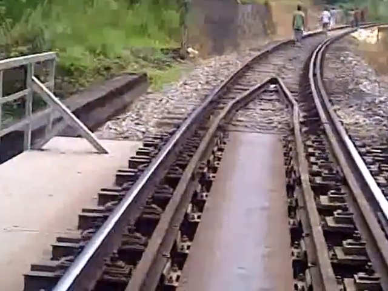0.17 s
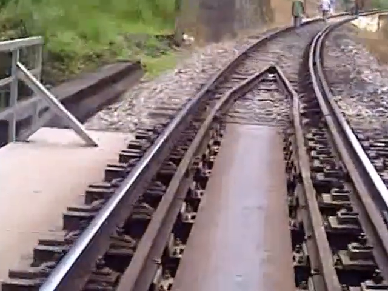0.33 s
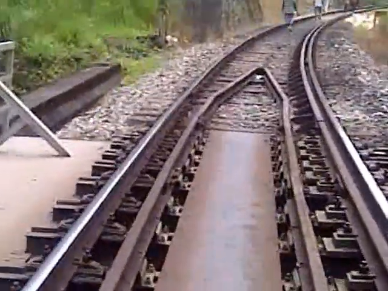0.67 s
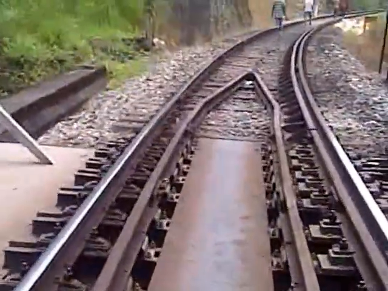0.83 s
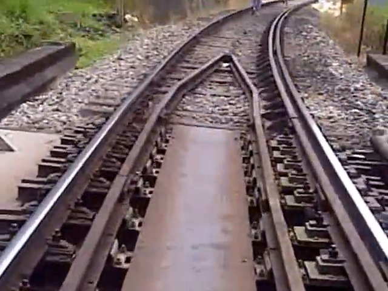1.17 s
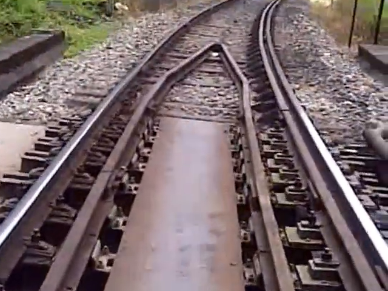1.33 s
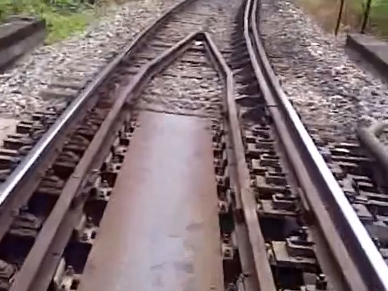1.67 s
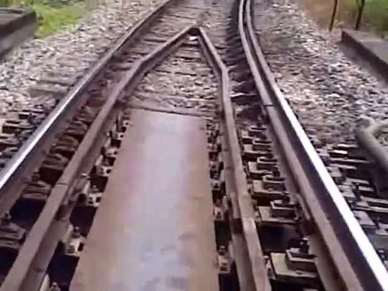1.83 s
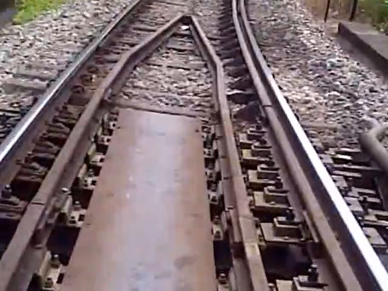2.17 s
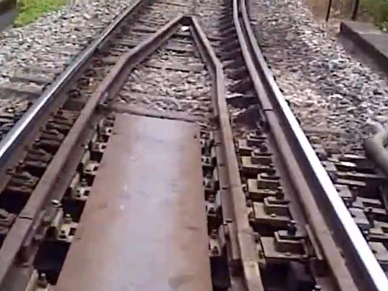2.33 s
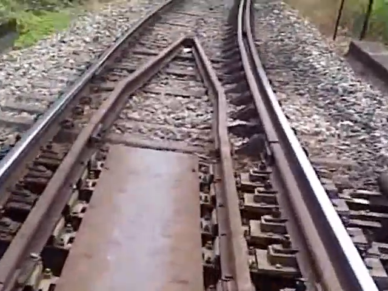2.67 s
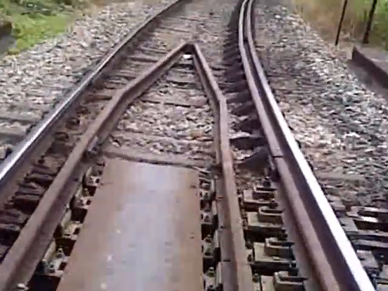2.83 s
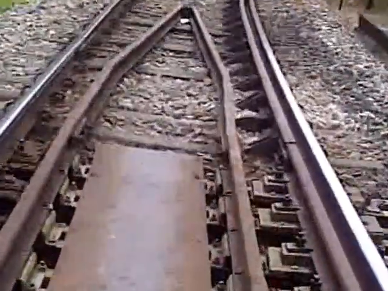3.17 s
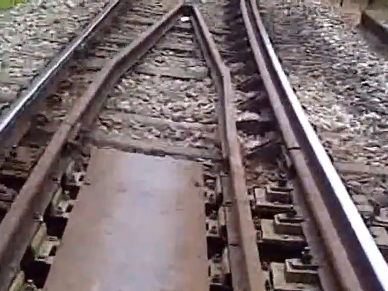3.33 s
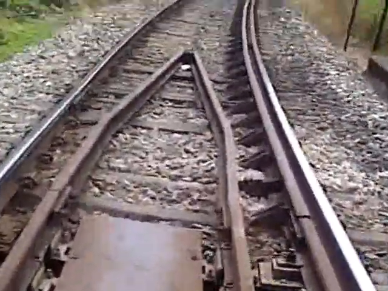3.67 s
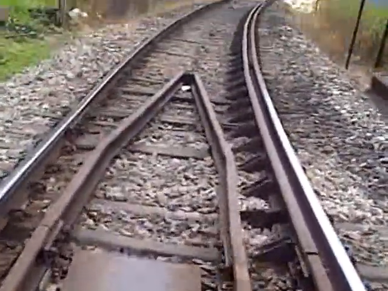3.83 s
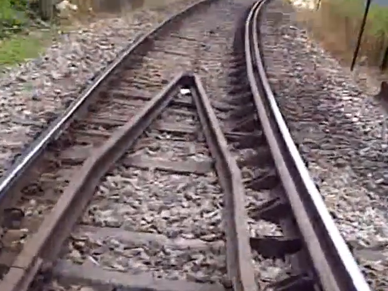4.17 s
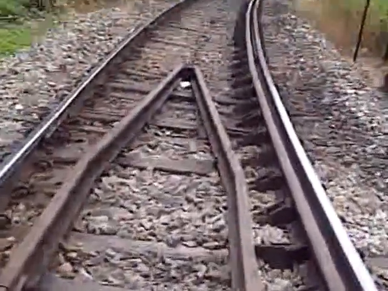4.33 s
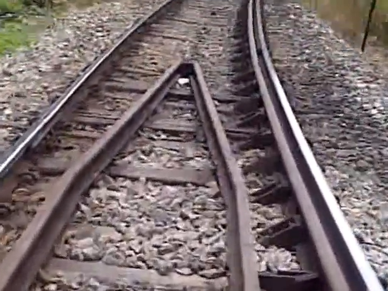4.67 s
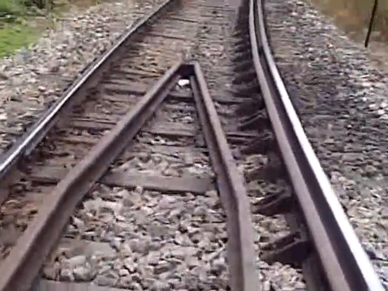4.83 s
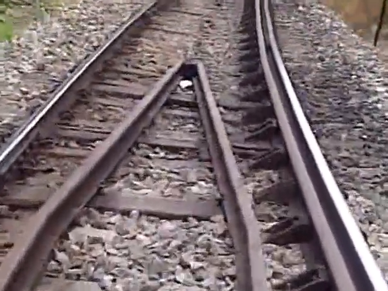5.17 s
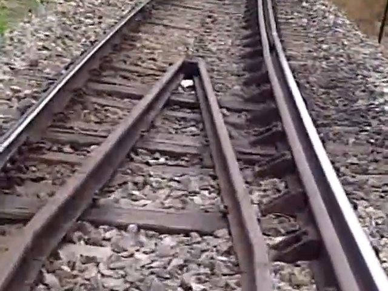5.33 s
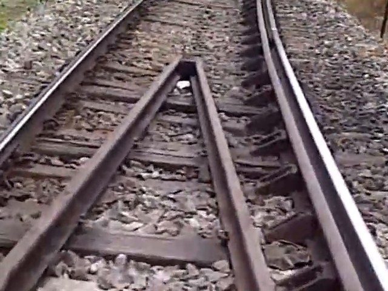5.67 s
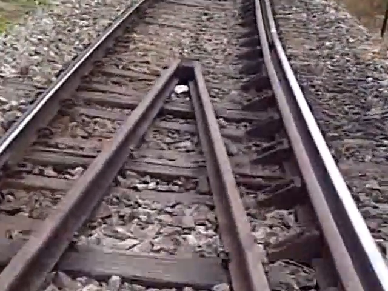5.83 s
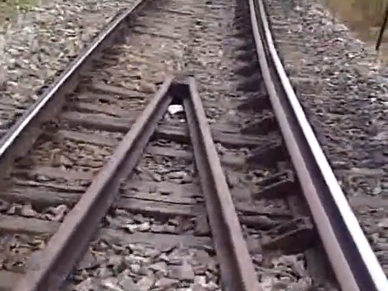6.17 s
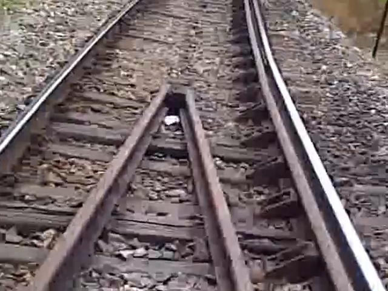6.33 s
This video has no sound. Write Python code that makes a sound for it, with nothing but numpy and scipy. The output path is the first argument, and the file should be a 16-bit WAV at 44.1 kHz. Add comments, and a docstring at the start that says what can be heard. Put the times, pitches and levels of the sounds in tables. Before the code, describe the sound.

Outdoors on a railway track, close dry knocks come first, then uneven footfalls boom on a loose steel plate. The plate slaps its supports after some steps in a dying rattle. A much louder, clanging step with a burst of clatter comes after four seconds, then near quiet with small stone ticks and a last short clack. Faint birds chirp in echoing trees over soft air; the microphone is carried by the walker.

```python
"""Footfalls boom in a loose steel plate as someone walks along a railway track towards the ballast.
The plate is a sum of decaying modes over a noise wash, and it slaps its supports as the weight shifts.
Filtered random impulses make crunching grit, resonant bursts loose stones, damped tones the rocking sleepers.
A few dry knocks and rubs sound close by; gliding tones with diffuse echoes are birds in the trees,
and coloured noise with slow and fast fluctuations is a faint outdoor rush."""
import sys
import numpy as np
from scipy import signal
from scipy.fft import rfft, irfft, next_fast_len
from scipy.io import wavfile
from scipy.ndimage import map_coordinates

SR = 44100
rng = np.random.default_rng(int(sys.argv[2]) if len(sys.argv) > 2 else 0)


def waveform_to_disk(signal):
    """Save audio, clipped to [-1, 1], as 16-bit WAV at the path in sys.argv[1]."""
    frames = np.transpose(np.atleast_2d(signal))
    scaled = np.clip(frames, -1, 1) * 32767
    samples = np.round(scaled).astype(np.int16)
    wavfile.write(sys.argv[1], SR, samples)


N = 286517  # length [samples]

# footfalls: (time [s], relative level [dB], hollow gain at 750 Hz [dB], edge gain from 4.2 kHz up [dB],
# note of the spot struck [Hz], decay-time factor [1], time constant of loading the plate [s])
FOOTFALLS = [(0.9734, -24, 0.5, -6, 293, 0.93, 0.00093), (1.507, -33, 3.5, 3, 192, 1.45, 0.0013),
             (2.577, -23.5, 1.5, -3.5, 275, 0.92, 0.0043), (3.048, -19, 1, 4.5, 380, 0.68, 0.0056),
             (4.103, -21, -0.5, 5.5, 322, 1.52, 0.0021), (4.121, -11.5, -0.5, -5.5, 472, 0.74, 0.00177),
             (4.606, -22.5, 4, 1, 413, 0.66, 0.0029), (6.143, -16.5, -16, 4, 340, 0.4, .0006)]
# spectrum of the plate's many weak modes, also used for broadband contact noise:
# (frequency [Hz], relative level per Hz [dB])
WEAK_MODES = [(25, -43), (60, -9), (130, -1.5), (300, 5.5), (500, 2), (750, -3.5), (1200, -3.5),
              (1650, -11.5), (2500, -8), (3230, -16.5), (3600, -20), (4900, -16.5), (6000, -30),
              (7500, -46)]


def amp(db):
    """Level to amplitude: 20 dB is a factor of ten."""
    return 10 ** (np.asarray(db) / 20)


def unit(x):
    """Normalisation: the signal scaled to an rms of 1."""
    return x / np.sqrt(np.mean(x ** 2) + 1e-20)


def along(points, hz):
    """Interpolation of (frequency [Hz], value) points on a logarithmic frequency axis."""
    f, value = np.transpose(points)
    return np.interp(np.log(hz + 1), np.log(f), value)


def seconds(length):
    """Sampling: a time axis [s] of the given length [s]."""
    return np.arange(int(length * SR)) / SR


def add(track, s, sound):
    """Superposition: sound pressures add, here from time s [s] onwards."""
    part = track[max(round(s * SR), 0):][:len(sound)]
    part += sound[:len(part)]


def filtered(x, response):
    """Linear filtering: the spectrum is multiplied by a response of frequency [Hz]."""
    m = next_fast_len(len(x) + 8192)
    return irfft(rfft(x, m) * response(np.fft.rfftfreq(m, 1 / SR)), m)[:len(x)]


def noise(spectrum, size):
    """Coloured noise: white noise shaped by a spectrum, at an rms of 1."""
    return unit(filtered(rng.standard_normal(size), lambda hz: amp(along(spectrum, hz))))


def wobble(rate):
    """Random modulation: a smooth spline through Gaussian knots, rate knots a second."""
    knots = rng.standard_normal(int(N * rate / SR) + 4)
    return map_coordinates(knots, [np.arange(N) * rate / SR])


def random_times(per_s):
    """Jittered timing: one uniformly random instant [s] in each period of 1 / per_s."""
    count = int(per_s * N / SR)
    return (np.arange(count) + rng.random(count)) / per_s


def contact(hz, boom_db, edge_db, clang_db=0):
    """Contact spectrum: a heavy contact feeds the bass, a hard, brief one the treble."""
    return amp(along([(450, boom_db), (1100, 0.0033), (2600, clang_db), (4200, edge_db)], hz))


def air(level_db=-52.0, drift_db=1.0, flutter_db=2.5, hiss_flutter_db=0.94, split_hz=800):
    """Broadband rush of the open air: the low part fluctuates more in level than the hiss."""
    # spectrum: (frequency [Hz], relative level per Hz [dB])
    rush_spectrum = [(20, -19.5), (40, -17), (60, -4), (120, -0.5), (220, -3), (350, -4.5), (480, -4),
                     (700, -8.5), (1100, -10), (1750, -15.5), (2500, -17), (3100, -22.5), (5000, -27.5),
                     (6800, -37), (7500, -54.5)]
    rush = noise(rush_spectrum, N)
    low = filtered(rush, lambda hz: 1 / (1 + (hz / split_hz) ** 4))
    hiss = rush - low
    drift = amp(level_db + drift_db * wobble(rate=1.842))
    restless_low = low * amp(flutter_db * wobble(rate=22))
    return drift * (restless_low + hiss * amp(hiss_flutter_db * wobble(rate=23)))


def bumps(level_db=-3, rise=0.0016, overtone=1.62, overtone_db=-9):
    """Damped resonance: sleepers rocking in their bed give brief low notes with a weak overtone."""
    # distinct bumps: (time [s], relative level [dB], note [Hz], 60 dB decay time [s])
    distinct = [(0.007, -35, 201, .09), (0.389, -32.5, 206, 0.09), (0.470, -31.5, 202, 0.092),
                (0.976, -17, 273, .06), (1.464, -32, 450, 0.052), (1.51, -18, 149, .09),
                (1.593, -17, 406, 0.062), (1.665, -19, 402, 0.065), (2.505, -26.5, 180, 0.073),
                (2.684, -22, 284, 0.11), (3.075, -12, 385, 0.09), (3.1, -16, 199, 0.095),
                (3.424, -32.5, 213, 0.075), (3.555, -29, 191, .11), (4.12, -3.5, 453, 0.049),
                (4.148, -5.5, 465, .055), (4.171, -6.5, 513, 0.053), (4.32, -19.5, 249, 0.081),
                (4.814, -35, 253, 0.13), (5.088, -35, 401, 0.074), (5.607, -36, 368, 0.085),
                (6.11, -33, 282, .08), (6.143, -16.5, 418, 0.039), (6.169, -18, 147, 0.12),
                (6.357, -34.5, 402, 0.05)]
    # fainter bumps all along the walk: level and pitch scatter about a typical bump
    faint_db, spread_db = -46, 2.5
    typical_hz, spread_octaves, faint_t60 = 233, 0.55, 0.18
    out, t = np.zeros(N), seconds(0.25)
    faint = [(s, faint_db + spread_db * rng.standard_normal(),
              typical_hz * 2 ** (spread_octaves * rng.standard_normal()), faint_t60)
             for s in random_times(per_s=12)]
    for s, db, hz, t60 in list(distinct) + faint:
        fundamental = np.sin(2 * np.pi * hz * t)
        upper = amp(overtone_db) * np.sin(2 * np.pi * overtone * hz * t)
        envelope = amp(db + level_db - 60 * t / t60) * (1 - np.exp(-t / rise))
        add(out, s, envelope * (fundamental + upper))
    return out


def cracks(size, rate, edge_db, spread_db=3):
    """Shot noise: random impulses of uneven size, on average rate a second, filtered to an rms of 1."""
    # spectrum of grit: (frequency [Hz], relative level per Hz [dB])
    grit_spectrum = [(40, -12.5), (150, 7), (400, 1.5), (800, -9.5), (1300, -11.5), (2600, -17.5),
                     (3600, -21), (5200, -21.5), (7500, -43.5)]
    sizes = rng.standard_normal(size) * amp(spread_db * rng.standard_normal(size))
    hits = sizes * (rng.random(size) < rate / SR)
    return unit(filtered(hits, lambda hz: amp(along(grit_spectrum, hz)) * contact(hz, 0, edge_db)))


def scuffs(level_db=-8, grain_rate=1400, t60=0.21, rise=0.0024):
    """Granular fracture: grit crushed under a sole is a decaying spray of tiny cracks."""
    # soft treads and scrapes: (time [s], relative level [dB], edge gain from 4.2 kHz up [dB])
    treads = [(0.008, -32.5, -30), (1.358, -35.5, -1), (2.504, -33, -5), (3.47, -37, -17),
              (3.557, -32, -30), (3.626, -27.5, -10), (5.09, -31, -6), (5.186, -34.5, -12),
              (5.606, -36, -16), (5.837, -44, 11), (6.25, -27, 2.5)]
    out, t = np.zeros(N), seconds(0.25)
    # the sole brushes the ground 22 ms before each footfall
    brushes = [(s - 0.022, -33.5, -16.5) for s, *_ in FOOTFALLS]
    # stray grit shifts at random
    strays = [(s, -44.5, -0.5) for s in random_times(per_s=3.7)]
    for s, db, edge_db in list(treads) + brushes + strays:
        envelope = amp(db + level_db - 60 * t / t60) * (1 - np.exp(-t / rise))
        add(out, s, envelope * cracks(len(t), grain_rate, edge_db))
    return out


def note(length, start_hz, middle_hz, end_hz, buzz=0.018):
    """Frequency modulation: a tone glides through three pitches; a fast random waver makes it buzzy."""
    t = seconds(length)
    u = t / length
    pitch = np.polyval(np.polyfit([0, 0.5, 1], [start_hz, middle_hz, end_hz], 2), u)
    waver = map_coordinates(rng.standard_normal(size=400), [t * 800])
    phase = 2 * np.pi * np.cumsum(pitch * (1 + buzz * waver)) / SR
    return np.sqrt(2 * np.sin(np.pi * u)) * np.sin(phase)


def scatter(x, t60, rise):
    """Diffuse scattering: leaves and trunks act as a decaying noise impulse response of unit energy."""
    t = seconds(0.8)
    trees = rng.standard_normal(len(t)) * amp(-60 * t / t60) * (1 - np.exp(-t / rise))
    return signal.fftconvolve(x, trees / np.linalg.norm(trees))[:N]


def birds(direct_db=-1.0, blur_db=-10, echo_db=-3, whistle_echo_db=-9, echo_t60=0.56):
    """Direct and scattered sound: near foliage blurs all calls, a wooded slope echoes far ones most."""
    # one bird's whistled phrases: (time [s], relative level [dB])
    phrases = [(0.027, -53), (3.416, -55.5), (5.934, -53.5)]
    # the rising notes of a phrase: (delay [s], length [s], start [Hz], middle [Hz], end [Hz],
    # relative level [dB])
    phrase_notes = [(0, 0.06, 1560, 1930, 1930, -1.5), (.098, .112, 1470, 2200, 2440, 0),
                    (.19, .11, 2440, 2560, 2580, -7)]
    # falling chirps of other birds: (time [s], length [s], start [Hz], fall [share of pitch],
    # relative level [dB], waver [share of pitch])
    falling = [(2.132, 0.081, 3520, 0.14, -54, 0.0082), (2.499, 0.014, 5000, 0.15, -55, 0.049),
               (2.532, 0.053, 3360, 0.064, -55.5, 0.024), (2.712, 0.01, 4300, 0.025, -54, 0.041),
               (2.751, 0.034, 5750, 0.087, -61, 0.047), (2.775, .026, 4150, 0.18, -51.5, 0.037),
               (4.7, 0.04, 3370, 0.12, -51, .006), (5.015, 0.083, 4330, 0.17, -53, .014),
               (5.287, 0.049, 5950, 0.17, -63.5, 0.0776), (5.543, 0.026, 5200, 0.16, -63, 0.046),
               (5.581, 0.04, 3300, .04, -61, .04), (6.005, .045, 5950, .18, -71, 0.012)]
    # buzzy calls wavering fast about one pitch: (time [s], length [s], relative level [dB])
    buzzes = [(2.392, 0.096, -59), (3.464, .045, -69), (3.684, 0.068, -59.5), (5.79, 0.2, -64)]
    early_fall = 0.5  # share of a chirp's fall done by its middle
    buzz_hz, buzz_waver = 3340, 0.11  # waver as a share of pitch
    whistles, chirps = np.zeros(N), np.zeros(N)
    for s, db in phrases:
        for delay, *glide, note_db in phrase_notes:
            add(whistles, s + delay, amp(db + note_db) * note(*glide))
    for s, length, hz, fall, db, waver in falling:
        chirp = note(length, hz, hz * (1 - early_fall * fall), hz * (1 - fall), waver)
        add(chirps, s, amp(db) * chirp)
    for s, length, db in buzzes:
        add(chirps, s, amp(db) * note(length, buzz_hz, buzz_hz, buzz_hz, buzz_waver))
    calls = whistles + chirps
    slope = scatter(amp(whistle_echo_db) * whistles + amp(echo_db) * chirps, echo_t60, rise=0.013)
    blur = scatter(calls, t60=0.035, rise=0.001)
    return amp(direct_db) * calls + amp(blur_db) * blur + slope


def ticks(level_db=-7, sharpness=17.0, snap_db=-5.0, snap_t60=0.0038, snap_edge_db=14):
    """Impact and resonance: loose stones tip or crack with a sharp snap, then ring at their own note."""
    # distinct ticks: (time [s], relative level [dB], note [Hz])
    distinct = [(0.978, -18.5, 1090), (0.992, -21, 2540), (1.358, -38.5, 1510), (1.537, -19, 2360),
                (1.598, -23, 2300), (1.665, -27, 2400), (1.676, -28, 1150), (1.767, -31.5, 2480),
                (1.785, -39, 1200), (1.719, -27.5, 2350), (1.967, -36, 2520), (2.229, -32, 1150),
                (2.584, -19.5, 1220), (3.777, -38, 2300), (3.789, -35.5, 1160), (3.85, -44, 2260),
                (4.127, -16, 1090), (4.134, -11, 1890), (4.143, -13.5, 2930), (4.153, -14, 2500),
                (4.187, -29, 4800), (4.259, -36, 4900), (5.09, -42, 1300), (5.112, -39, 2120),
                (5.163, -37, 1350), (5.381, -37, 1150), (5.609, -42, 453), (5.752, -47, 1120),
                (5.837, -36, 2430), (5.857, -35, 1680), (6.1475, -15, 2370), (6.372, -35, 1200)]
    # fainter stones settling all along the walk: level and pitch scatter about a typical tick
    faint_db, spread_db = -50, 4
    typical_hz, spread_octaves = 1020, 0.59
    stone_t60 = 0.032  # s, of every stone
    out, t = np.zeros(N), seconds(0.06)
    faint = [(s, faint_db + spread_db * rng.standard_normal(),
              typical_hz * 2 ** (spread_octaves * rng.standard_normal()))
             for s in random_times(per_s=9.9)]

    for s, db, note_hz in list(distinct) + faint:
        def resonance(hz):
            return 1 / (1 + 1j * sharpness * (hz / note_hz - 1)) / (1 + (hz / 4500) ** 4)
        stone = unit(filtered(rng.standard_normal(len(t)), resonance))
        snap = unit(filtered(noise(WEAK_MODES, len(t)), lambda hz: contact(hz, -snap_edge_db, 0)))
        tick = amp(-60 * t / stone_t60) * stone + amp(snap_db - 60 * t / snap_t60) * snap
        add(out, s, amp(db + level_db) * tick)
    return out


def knocks(level_db=-6, after_db=-23, after_t60=0.12, after_boom_db=-6, thud_hz=230, thud_t60=0.029,
           even_db=-15.5, edge_per_db=0.46):
    """Modal impact: close dry knocks excite damped modes, brighter when harder, over a soft thud."""
    # knocks: (time [s], relative level [dB], thud level [dB])
    blows = [(0.503, -26, -31.5), (0.540, -24.5, -38), (0.562, -20, -47), (0.597, -23.5, -32),
             (0.6129, -5, -51), (0.694, -25, -27.5), (0.705, -25.5, -47)]
    # modes of the knocked body: (frequency [Hz], relative level [dB], 60 dB decay time [s])
    body_modes = [(490, 1.5, 0.027), (990, 6, 0.0043), (1280, -16, 0.054), (1770, -12.5, 0.008),
                  (3400, -14, 0.0072), (5370, -28.5, 0.005)]
    # faint rubs before the hardest knock: (time [s], length [s], level [dB])
    rubs = [(0.531, 0.054, -39.5), (0.582, 0.038, -42.5)]
    out, t = np.zeros(N), seconds(0.15)
    for s, db, thud_db in blows:
        edge_db = edge_per_db * (db - even_db)  # negative below even_db: softer is duller
        ring = np.zeros(len(t))
        for k, (hz, mode_db, t60) in enumerate(body_modes):
            gain = (-1) ** k * contact(hz, 0, edge_db, edge_db)
            ring += gain * amp(mode_db - 60 * t / t60) * np.sin(2 * np.pi * hz * t)
        thud = amp(thud_db - 60 * t / thud_t60) * np.sin(2 * np.pi * thud_hz * t)
        rustle = filtered(noise(WEAK_MODES, len(t)), lambda hz: contact(hz, after_boom_db, 0))
        rustle *= amp(after_db - 60 * t / after_t60)
        add(out, s, amp(db + level_db) * (ring + rustle) + thud)
    for s, length, db in rubs:
        swell = np.hanning(len(seconds(length)))
        grains = cracks(len(swell), rate=1900, edge_db=-1.5)
        rub = unit(filtered(grains, lambda hz: contact(hz, -9.5, 0)))
        add(out, s, amp(db) * swell * rub)
    return out


def plate(boom_db, hollow_db, clang_db, edge_db, spot_hz, ring, rise, modes_db=-14.5, spot_db=5,
          clang_peak_db=6, chatter_db=-4, chatter_t60=0.064):
    """Modal synthesis: a blow excites decaying plate modes, favouring a low note and a high clang."""
    # strong modes: (frequency [Hz], relative level [dB], 60 dB decay time at ring = 1 [s])
    strong_modes = [(99.7, -10, 3.8), (142, 2, 0.72), (165.3, -2.5, 1.42), (210, -3.5, 0.85),
                    (242, -4, 1.5), (272, 2.5, 0.61), (308.7, 0.5, 1.05), (379, -0.5, 0.91),
                    (449.5, 2.5, 0.94), (477, -1.5, 0.6), (533, -2, 0.87), (571, -4.5, 0.54),
                    (652, -6.5, 0.76), (699, -6.5, 0.84), (744, -5.5, 0.82), (898, -8.5, 0.29),
                    (934, -7, 0.65), (1037, -8, 0.45), (1130, -2.5, 0.5), (1248, -1, 0.38),
                    (1379, -7.5, 0.23), (1645, -3, 0.36), (1904, -2.5, 0.25), (1990, -4.5, .25),
                    (2345, -9, 0.2), (2475, -8, 0.2), (2610, -8, 0.2), (2855, -13, 0.23), (2980, -10, 0.16),
                    (3104, -6.5, 0.22)]
    # weak modes: (frequency [Hz], 60 dB decay time at ring = 1 [s])
    weak_t60 = [(60, 0.51), (200, 0.96), (450, 0.56), (1100, 0.51), (2700, 0.27), (6000, 0.22)]
    t = seconds(1)
    blow = [(450, boom_db), (750, hollow_db), (1150, 0.0078), (2600, clang_db), (4200, edge_db)]
    # a stiffer spot also clangs higher: 0.28 octaves per octave of its note
    clang_hz = 2566 * (spot_hz / 310) ** 0.28

    def colour(hz):
        spot_peak = spot_db / (1 + (7 * (hz / spot_hz - 1)) ** 2)
        clang_peak = clang_peak_db / (1 + (11 * (hz / clang_hz - 1)) ** 2)
        return amp(along(blow, hz) + spot_peak + clang_peak)

    # the weak modes merge into a wash that decays at its own pace in each band
    f, age, bands = signal.stft(filtered(noise(WEAK_MODES, len(t)), colour), SR, nperseg=256)
    decay = amp(-60 * age / (ring * along(weak_t60, f)[:, None]))
    wash = signal.istft(bands * decay, SR, nperseg=256)[1][:len(t)]
    # the strong modes wake in new strengths and polarities at every blow
    hz, db, t60 = np.transpose(strong_modes)
    size = amp(db + modes_db + rng.normal(0, 2.1, len(hz))) * colour(hz)
    size *= rng.choice([-1, 1], len(hz))
    mode_decay = np.exp(-np.log(1000) * t / (ring * t60[:, None]))
    modes = size @ (np.sin(2 * np.pi * hz[:, None] * t) * mode_decay)
    # steel chatters against its seat in the first moments
    chatter = amp(chatter_db - 60 * t / chatter_t60) * cracks(len(t), rate=760, edge_db=edge_db)
    return (wash + modes + chatter) * (1 - np.exp(-t / max(rise, 1e-4)))


def footfalls(girders_db=-15.0, girders_t60=1.84, shudder_db=4.0, even_db=-24, boom_loss=0.63,
              clang_share=0.74):
    """Structure-borne sound: each step strikes the plate and the structure beneath shudders after it."""
    # rumble of the structure: (frequency [Hz], relative level per Hz [dB])
    girder_spectrum = [(25, -32), (70, 2.5), (110, 0), (300, -4.5), (500, -5.5), (1000, -20.5),
                       (2500, -21.5), (5000, -51)]
    out, t = np.zeros(N), seconds(2.0)
    for s, db, hollow_db, edge_db, spot_hz, ring, rise in FOOTFALLS:
        boom_db = boom_loss * (even_db - db)  # a harder step has a smaller share of bass
        clang_db = clang_share * edge_db
        strike = plate(boom_db, hollow_db, clang_db, edge_db, spot_hz, ring, rise)
        add(out, s, amp(db) * strike)
        fade_db = shudder_db * wobble(rate=39)[:len(t)] - 60 * t / (ring * girders_t60)
        rumble = noise(girder_spectrum, len(t)) * amp(fade_db) * (1 - np.exp(-t / 0.033))
        add(out, s, amp(db + boom_db + girders_db) * rumble)
    return out


def rattles(level_db=-9.5, smack_db=-2, smack_t60=0.023):
    """Repeated impact: the loose plate slaps its supports with a short hard smack and a ring; the last row is
    the sharp smack of the footfall at 6.143 s itself."""
    # slaps, the last being the hard smack of the footfall at 6.143 s: (time [s], relative level [dB], # clang
    # gain at 2.6 kHz [dB], edge gain from 4.2 kHz up [dB], note of the spot struck [Hz])
    slaps = [(1.068, -32.5, 3.5, 2.5, 320), (1.5072, -28, -1, 13.5, 415), (1.5354, -20.5, 1.5, 0, 210),
             (1.5962, -22.5, 0.5, 2, 370), (1.664, -25, 1.5, 5.5, 252), (1.717, -25.5, -3, 2.5, 297),
             (1.765, -30, 1.5, 3, 230), (1.811, -39.5, 4.5, 6.5, 282), (1.914, -38, -0.5, -1, 286),
             (1.967, -31, -3.5, -1, 270), (2.017, -35, -2, -5, 293), (2.158, -31, -8, 1.5, 327),
             (2.229, -24, -7, -2, 282), (4.148, -17.5, 3, -10, 490), (4.1856, -13, 10.5, 5.5, 610),
             (4.228, -21, 1.5, 5, 553), (4.257, -21, 7, 5, 330), (4.281, -24.5, 7, 4, 540),
             (4.323, -27, 2.5, 3.5, 297), (4.441, -23.5, 3.5, -8, 480), (6.1427, -21.5, 12.5, 12.5, 440)]
    out, t = np.zeros(N), seconds(0.1)
    for s, db, clang_db, edge_db, spot_hz in slaps:
        slap = plate(boom_db=-1.5, hollow_db=4.5, clang_db=clang_db, edge_db=edge_db, spot_hz=spot_hz,
                     ring=0.71, rise=0.0011, spot_db=7.5, chatter_db=-3.5, chatter_t60=0.076)
        burst = noise(WEAK_MODES, len(t))
        smack = unit(filtered(burst, lambda hz: contact(hz, -2.0, edge_db - 6, clang_db)))
        add(out, s, amp(db + level_db) * slap)
        add(out, s, amp(db + level_db + smack_db - 60 * t / smack_t60) * smack)
    return out


def scene():
    """Superposition: all the sources add at one listening point."""
    ground = bumps() + scuffs() + ticks()
    steel = footfalls() + rattles()
    return (air() + ground + birds() + knocks() + steel)[None]


def record(dry, top_hz=7600):
    """Band limiting: the gain falls linearly from 1 to 0 over 400 Hz centred on top_hz."""
    return filtered(dry[0], lambda hz: np.clip((top_hz - hz) / 400 + 0.5, 0, 1))[None]


dry = scene()
out = record(dry)
waveform_to_disk(out)
```